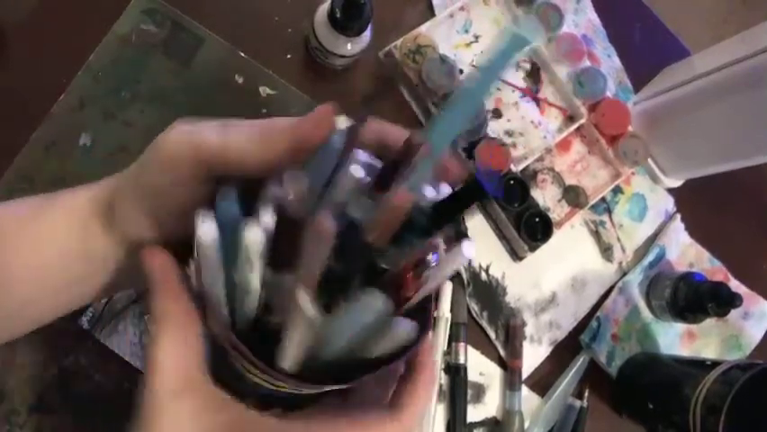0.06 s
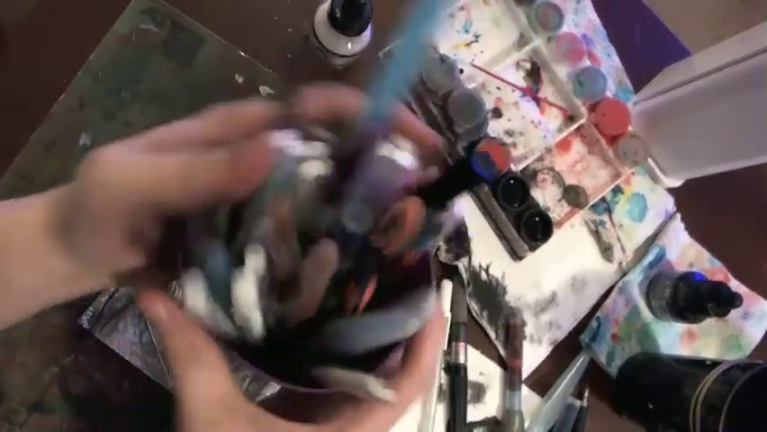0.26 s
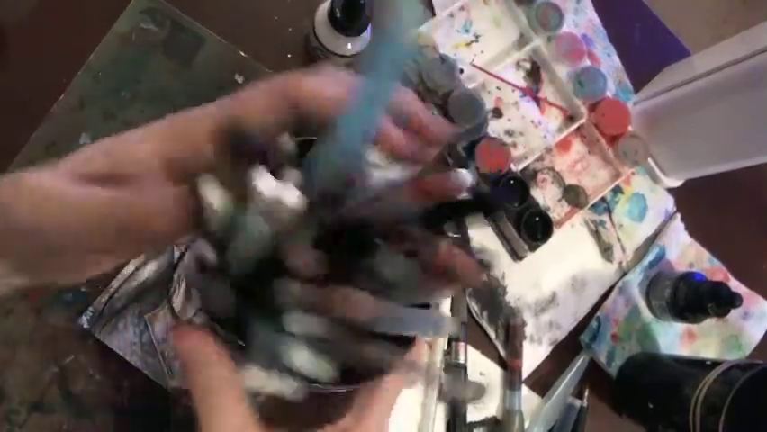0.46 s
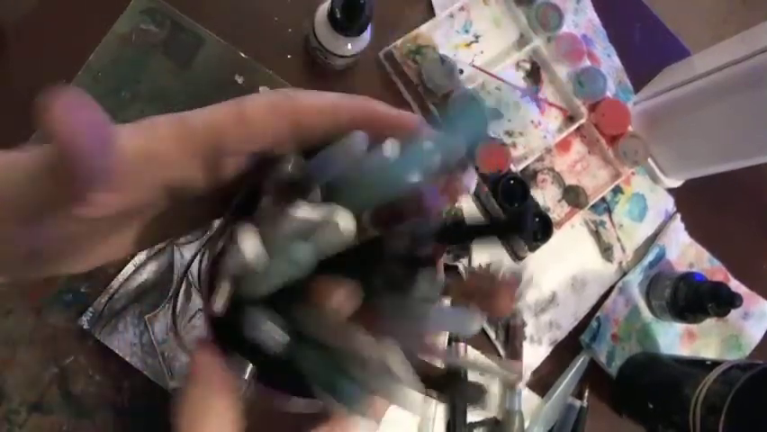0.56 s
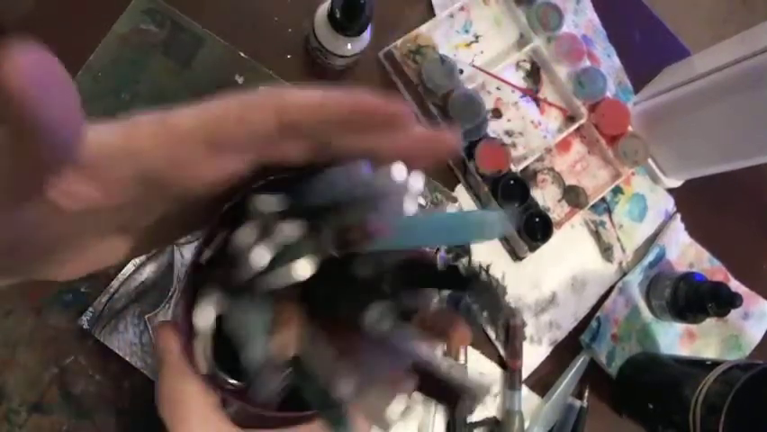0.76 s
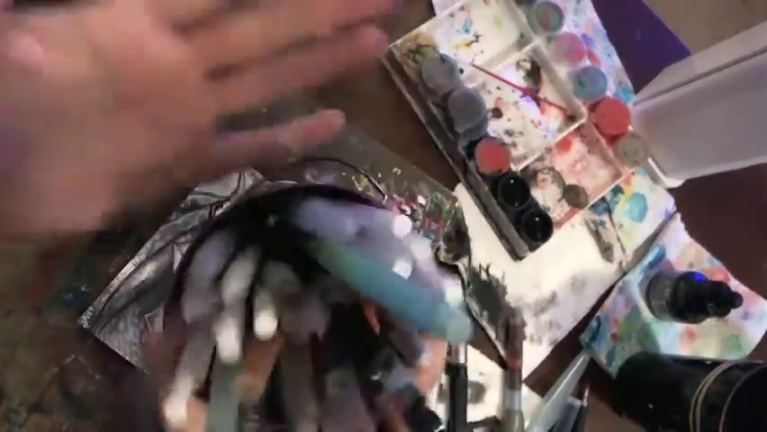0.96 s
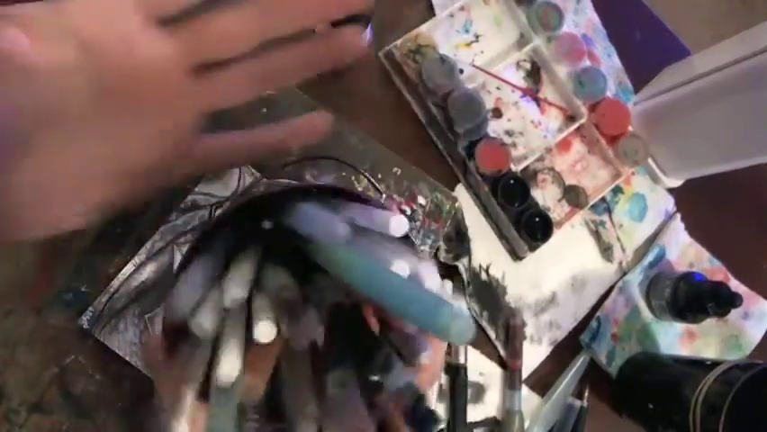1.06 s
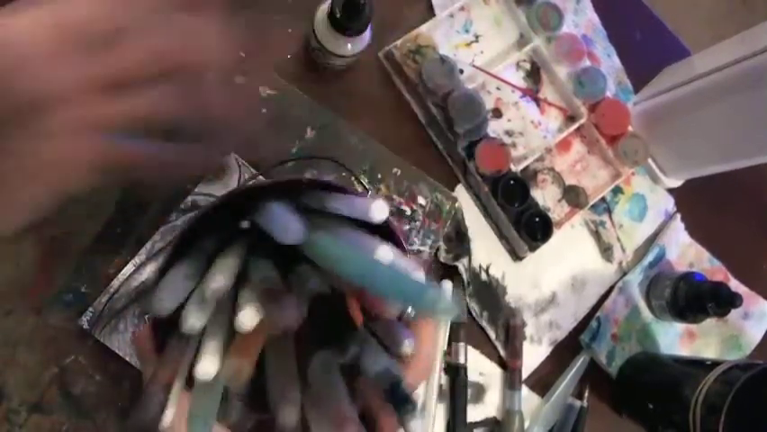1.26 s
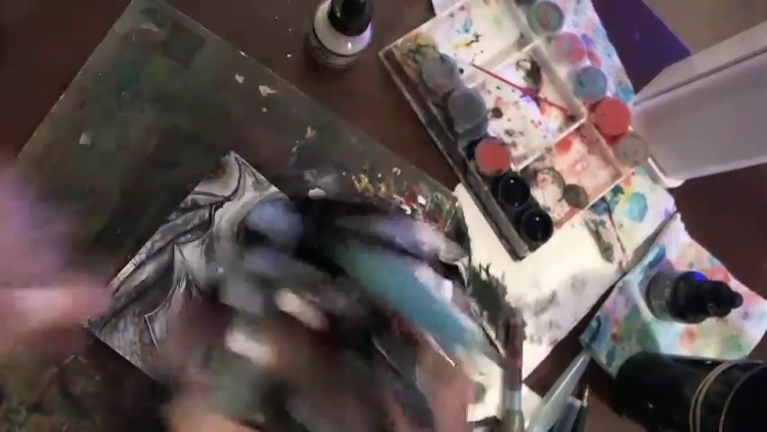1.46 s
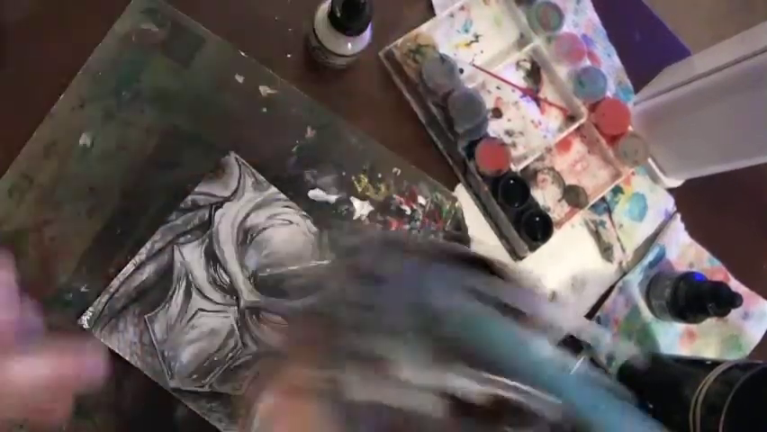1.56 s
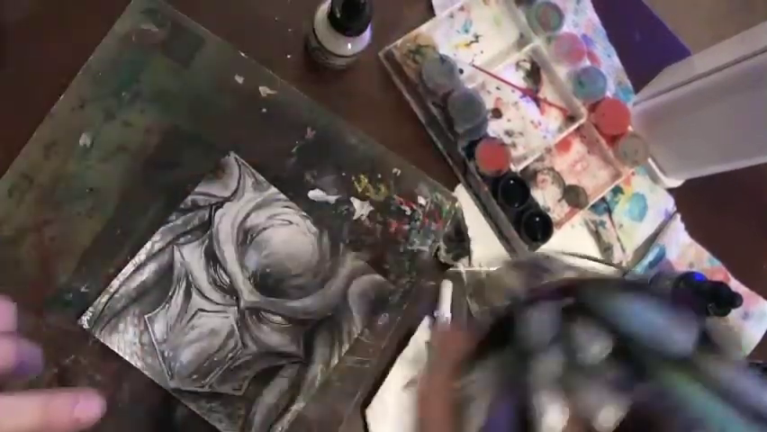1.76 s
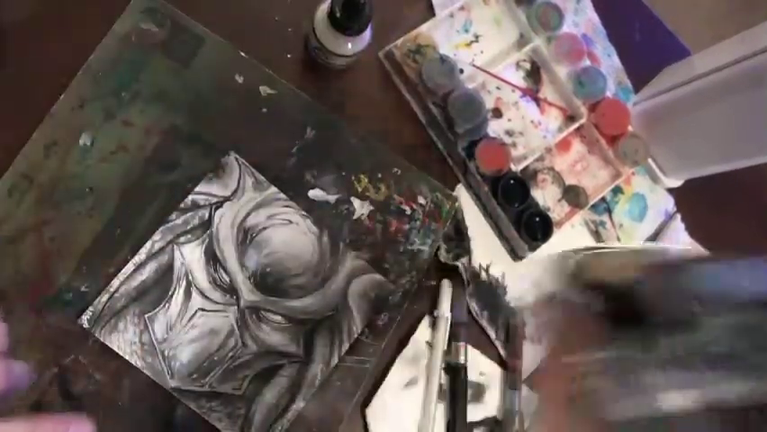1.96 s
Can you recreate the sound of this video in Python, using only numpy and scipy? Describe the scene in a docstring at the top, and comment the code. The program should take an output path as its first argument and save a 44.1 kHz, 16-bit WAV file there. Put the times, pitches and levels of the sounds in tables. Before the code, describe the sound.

Pens clatter and slide inside a crammed cup as it is tipped about, close up in a quiet small room. Two bursts of plastic rattling with hollow knocks are separated by sparse clicks, and a few light clicks finish.

```python
"""A cup crammed with plastic pens and markers, tipped about over a desk in a small room, microphone close.
The pens slide, clack against each other and knock on the wall of the cup, which answers with a hollow
note near 750 Hz. Two flurries of rattling, then a few last clicks, over faint room tone and a short tail
from desk and walls. The hardest knocks overload the recorder."""
import sys
import numpy as np
from scipy import signal
from scipy.fft import rfft, irfft
from scipy.io import wavfile

SR = 44100
rng = np.random.default_rng(int(sys.argv[2]) if len(sys.argv) > 2 else 0)


def store_pcm(level_fs):
    """Save levels as 16-bit WAV."""
    pcm = np.round(np.clip(level_fs, -1, 1) * 32767).astype(np.int16)
    wavfile.write(sys.argv[1], SR, np.atleast_2d(pcm).T)


N = 88200

# spectrum of the steady room tone: f/Hz, level/dB
ROOM_TONE_SPECTRUM = [(20, -8), (55, -22), (105, 6), (200, 1.5), (300, -5), (600, -8.5), (3000, -18),
                      (8000, -25.5), (13000, -37.5)]
# tail from desk and walls, band by band: f/Hz, t60/s, level/dB
ROOM_BANDS = [(320, 0.23, -22), (875, 0.055, -24.5), (1410, 0.094, -28), (2875, 0.16, -23.5),
              (5200, 0.096, -21.5), (9900, 0.15, -26)]
# vigour of the jostling between the clear contacts: t/s, level/dB
JOSTLE_VIGOUR = [(0, -52), (.03, -58), (.06, -38), (.11, -42.5), (.15, -45), (.175, -70), (.2, -59.5),
                 (.27, -32.5), (.31, -38.5), (.4, -30.5), (.47, -28.5), (.62, -39.5), (.68, -50),
                 (.77, -67), (1.12, -79.5), (1.25, -58.5), (1.33, -77.5), (1.41, -52), (1.46, -57.5),
                 (1.52, -34.5), (1.6, -49), (1.66, -37.5), (1.7, -46), (1.77, -67), (1.99, -70)]
# balance of one jostle: level/dB for cup, low clack, high clack, click, tick
JOSTLE_BALANCE = [-10, -7.5, -6, -5, -23]
# pen ends on the bottom of the cup and a bump of the hand: t/s, f/Hz, level/dB
DULL_KNOCKS = [(.415, 546, -38), (.452, 580, -30), (.555, 587, -36), (.611, 441, -35), (1.476, 1510, -25.5),
               (1.542, 330, -38), (1.6589, 1160, -28), (1.849, 1083, -35.5)]
# modes of the cup: ratio to its pitch, level/dB, t60/s
CUP_RESONANCES = [(.88, -13, .022), (1, 0, .024), (1.07, -8, .02)]
# modes shared by the pen barrels: f/Hz, level/dB, t60/s
BARREL_MODES = [(1674, 1, 0.062), (1883, 6.5, 0.06), (2545, 4, 0.038), (2663, 0, 0.042), (3600, 6.5, 0.023),
                (4247, 0.5, 0.05), (4897, 8.5, 0.03), (5230, 11, 0.057), (5697, 5, 0.035),
                (7930, 9.5, 0.03), (8840, -1, 0.04)]
# a pen's low clack, high clack, click and tick: lower f/Hz, upper f/Hz, t60/s, barrel mode level/dB
PEN_BANDS = [(1417, 2150, 0.024, 0), (2195, 3300, 0.008, 2.5), (3540, 7010, 0.023, 0),
             (6150, 10170, 0.034, -5)]
# clear pen contacts: t/s, cup f/Hz, pen f/Hz, then level/dB for cup, low clack, high clack, click, tick
PEN_CONTACTS = [(0.0367, 716, 2510, -53, -43.5, -40, -46, -55),
                (0.0655, 748, 2720, -33.5, -69, -41, -58, -51),
                (0.0807, 781, 2500, -33, -46.5, -37.5, -55, -51),
                (0.0912, 760, 5070, -45, -54.5, -37.5, -34.5, -39),
                (0.145, 774, 5250, -37.5, -55, -55, -46, -57),
                (0.185, 800, 5220, -40, -42, -37, -34, -40.5),
                (0.1972, 790, 2780, -32.5, -37, -29.5, -32, -43),
                (0.2085, 810, 5360, -29, -32.5, -31, -23, -57),
                (0.2253, 753, 3006, -14, -16.5, -14, -19, -25),
                (0.2427, 720, 5300, -45, -23, -22.5, -36, -61.5),
                (0.2494, 733, 5330, -16, -33, -23.5, -12, -23),
                (0.2522, 749, 5800, -18, -27, -20, -27, -31),
                (0.3145, 800, 1650, -36, -32, -34.5, -52, -65),
                (0.3297, 830, 4150, -24, -30.5, -26.5, -18.5, -27),
                (0.3712, 770, 4320, -27.5, -22.5, -32, -8, -19),
                (0.374, 797, 5700, -19, -32.5, -19.5, -13.5, -12.5),
                (0.3849, 774, 5825, -25, -30.5, -26.5, -12.5, -17.5),
                (0.4004, 770, 1830, -29, -25, -52.5, -35, -38.5),
                (0.414, 760, 3590, -25.5, -26, -25, -20, -35.5),
                (0.4237, 778, 2600, -29.5, -32, -27.5, -44, -39),
                (0.4375, 770, 1880, -36, -28, -34.5, -35, -36),
                (0.444, 870, 1940, -26.5, -26, -46.5, -30, -28),
                (0.4498, 740, 2680, -32.5, -22, -24, -22, -40),
                (0.4535, 715, 5560, -18, -24.5, -18.5, -18, -24),
                (0.4831, 840, 1720, -30, -25, -30, -33.5, -50),
                (0.4946, 910, 2660, -34, -28, -25, -26.5, -35),
                (0.5126, 786, 5780, -33, -47, -35.5, -19, -31),
                (0.5221, 845, 5370, -31.5, -29.5, -30.5, -18, -28),
                (0.5366, 765, 2550, -35.5, -45, -30, -37, -49),
                (0.553, 798, 4040, -26.5, -35, -33, -28.5, -52.5),
                (0.5711, 752, 1900, -26, -29, -27.5, -29.5, -48),
                (0.5857, 665, 1850, -32.5, -26, -28, -30, -35.5),
                (0.5931, 750, 1950, -33, -19, -21.5, -21.5, -52),
                (0.6092, 685, 3710, -24.5, -28, -25, -20, -25),
                (0.6135, 741, 2694, -25, -38, -24.5, -26.5, -38),
                (0.633, 820, 2580, -38, -29.5, -29, -25.5, -38),
                (0.648, 716, 5770, -41.5, -36, -32.5, -29, -43),
                (0.691, 823, 4850, -28.5, -33, -34, -33.5, -39),
                (0.696, 785, 4470, -37.5, -43, -32.5, -29, -35),
                (0.821, 727.6, 2610, -45.5, -70, -53.5, -63, -78.5),
                (0.8473, 784, 2437, -66.5, -48.5, -38, -45.5, -58),
                (0.8599, 692, 7500, -56, -41.5, -42.5, -38, -44),
                (0.8938, 890, 2395, -31.5, -27.5, -27, -26.5, -33.5),
                (0.9087, 750, 5065, -26.5, -31.5, -26.5, -18.5, -32),
                (0.9442, 770, 2620, -60.5, -58, -44, -48.5, -65.5),
                (1.1474, 757, 1560, -37, -67, -73, -71.5, -79),
                (1.1809, 784, 2614, -32, -35, -27, -36, -34), (1.199, 765, 2573, -40, -46, -39, -45.5, -55),
                (1.239, 786, 2670, -68, -53, -40, -48, -70),
                (1.2539, 820, 2280, -55.5, -44.5, -33, -43.5, -54.5),
                (1.2933, 790, 5770, -49, -56, -50, -45, -47.5),
                (1.3133, 768, 2330, -56, -61, -49, -55, -64.5),
                (1.352, 844, 2610, -53, -35.5, -29.5, -35.5, -58),
                (1.3602, 786, 7330, -36, -46, -50.5, -38, -38.5),
                (1.3767, 773, 5120, -64, -49, -45, -36.5, -37),
                (1.3932, 950, 2755, -65, -51, -38, -41, -47), (1.422, 760, 8460, -48, -49, -52, -49, -44.5),
                (1.445, 810, 2170, -50, -55, -44, -50, -64.5), (1.4503, 820, 2410, -53, -38, -33, -39, -63),
                (1.477, 770, 1540, -24, -19, -32, -31.5, -53),
                (1.485, 779, 4960, -27.5, -52, -43, -28.5, -45.5),
                (1.494, 763, 2670, -29.5, -40, -20.5, -22.5, -33.5),
                (1.5234, 736, 2600, -20.5, -23, -31.5, -27, -40),
                (1.5312, 760, 2670, -38, -41, -31, -35, -37.5),
                (1.5384, 756, 4630, -18, -30, -17.5, -15, -21.5),
                (1.5479, 743, 5610, -26, -29.5, -20.5, -17, -28),
                (1.6135, 730, 5300, -28.5, -30.5, -33, -28.5, -29),
                (1.6205, 750, 1673, -23, -23.5, -24, -21, -41),
                (1.6354, 745, 2700, -32.5, -51, -32.5, -32, -39.5),
                (1.6592, 797, 9350, -20, -16, -17.5, -14.5, -16.5),
                (1.6728, 760, 5380, -52, -60, -34.5, -27, -28), (1.68, 840, 5130, -52, -54, -40, -48, -22),
                (1.6842, 790, 5210, -52, -43, -43, -25.5, -31),
                (1.7068, 760, 2770, -74, -41, -42, -38, -44),
                (1.849, 770, 2540, -40, -44.5, -31.5, -30.5, -35),
                (1.8963, 844, 2570, -58.5, -47, -28, -33.5, -29.5),
                (1.9015, 870, 5026, -54, -42.5, -34, -22.5, -38)]
# colour of the two microphone ports: f/Hz, left minus right level/dB
PORT_COLOUR = [(200, -.5), (550, 3), (2700, -1.04), (3950, -6), (5000, 1.5), (6100, 3), (7000, .5)]

ROOM_TONE_DB, ROOM_TONE_WIDTH = -64.5, .3
FIRST_ECHO_S, TAIL_SIDE_SHARE = 0.0044, 0.06
CUP_HZ, CUP_RISE_S = 766, 0.0016
CUP_AIR_HZ, CUP_AIR_T60_S, CUP_AIR_DB = 762, 0.091, -8.5
THUD_DB, THUD_TOP_HZ, THUD_T60_S = -35, 380, 0.051   # level relative to the cup's note
JOSTLES_PER_S, JOSTLE_SPREAD_DB = 150, 3
SCRAPE_DB, SCRAPE_CUP_DB = -12, -3   # relative to the jostling; the cup relative to the barrels
KNOCK_T60_S, KNOCK_EDGE_RATIO = 0.018, 1.35
GRAZE_DB, GRAZE_LEAD_S = -17.5, .0035
MODE_SPREAD_DB, PEN_DETUNE, CUP_DETUNE = 7, 0.018, 0.028   # from one contact to the next
PEN_RISE_S, PEN_NOTE_DB, PEN_NOTE_T60_S = 0.00054, 4, .022
PEN_LOW_HZ = 600   # thin pens radiate little below this
ONSET_S, CONTACT_S = .006, .05
SOFT_RISE_S, FIRM_DB = 0.0016, -31   # contacts well under this level swell instead of snapping
DAMPING_PER_S = 650   # a pen driven hard into the bundle stops sooner: extra decay rate at full scale
OVERLOAD_CEILING, LOW_CUT_HZ, HIGH_CUT_HZ = 1.06, 50, 13700


def from_db(db):
    return 10 ** (np.asarray(db) / 20)


def band(x, low_hz, high_hz, order=2):
    edges_hz = [low_hz, min(high_hz, .45 * SR)]
    return signal.sosfilt(signal.butter(order, edges_hz, "band", fs=SR, output="sos"), x)


def decay(t, t60):
    return np.exp(-np.log(1000) * t / t60)


def unit_onset(x):
    """Scale each row to rms 1 over its first milliseconds."""
    return x / np.sqrt(np.mean(x[:, :int(ONSET_S * SR)] ** 2, axis=1, keepdims=True) + 1e-20)


def add(out, start_s, sound):
    i = int(np.clip(start_s * SR, 0, N))
    out[i:i + len(sound)] += sound[:N - i]


def room_tone():
    """The room itself: a faint low rumble with a trace of hiss."""
    hz, db = np.transpose(ROOM_TONE_SPECTRUM)
    bins_hz = np.arange(N // 2 + 1) * SR / N
    gain = from_db(np.interp(np.log(bins_hz + 1), np.log(hz), db))
    mid, side = irfft(rfft(rng.standard_normal((2, N))) * gain, N)
    return from_db(ROOM_TONE_DB) * (mid + ROOM_TONE_WIDTH * side * [[1], [-1]]) / mid.std()


def room_tail(x):
    """Desk and nearby walls return a short tail, dying at its own pace in each band."""
    t = np.arange(SR // 2) / SR
    centres_hz = np.array([row[0] for row in ROOM_BANDS])
    edges_hz = [40, *np.sqrt(centres_hz[1:] * centres_hz[:-1]), 12000]
    response = 0
    for (_, t60, db), low, high in zip(ROOM_BANDS, edges_hz, edges_hz[1:]):
        tails = band(rng.standard_normal((2, len(t))) * decay(t, t60) * (t > FIRST_ECHO_S), low, high)
        mid, side = tails / np.sqrt(np.sum(tails ** 2, axis=1, keepdims=True))
        stereo = np.sqrt(1 - TAIL_SIDE_SHARE) * mid + np.sqrt(TAIL_SIDE_SHARE) * side * [[1], [-1]]
        response = response + from_db(db) * stereo
    return signal.fftconvolve(x[None], response, axes=1)[:, :N]


def cup_air(x):
    """The air in the cup rings on at one pitch after every contact."""
    width_hz = np.log(1000) / (np.pi * CUP_AIR_T60_S)
    resonance = signal.iirpeak(CUP_AIR_HZ, CUP_AIR_HZ / width_hz, fs=SR)
    return from_db(CUP_AIR_DB) * signal.lfilter(*resonance, x)


def scrape():
    """Barrels sliding on each other hiss with the jostling, and stir the cup."""
    barrels = band(rng.standard_normal(N), 1700, 9500)
    cup = band(rng.standard_normal(N), 830, 960)
    friction = barrels / barrels.std() + from_db(SCRAPE_CUP_DB) * cup / cup.std()
    vigour_db = np.interp(np.arange(N) / SR, *np.transpose(JOSTLE_VIGOUR))
    return from_db(vigour_db + SCRAPE_DB) * friction


def jostles():
    """Contact rows for the small chance touches of pens shifting in the bundle."""
    count = int(JOSTLES_PER_S * N / SR)
    starts_s = (np.arange(count) + rng.random(count)) * N / SR / count
    chance = rng.standard_normal((count, 8))
    vigour_db = np.interp(starts_s, *np.transpose(JOSTLE_VIGOUR)) + JOSTLE_SPREAD_DB * chance[:, 0]
    cup_hz = CUP_HZ * np.exp(.05 * chance[:, 1])
    pen_hz = 3600 * np.exp(.5 * chance[:, 2])
    levels_db = vigour_db[:, None] + np.array(JOSTLE_BALANCE) + 2 * chance[:, 3:]
    return np.column_stack([starts_s, cup_hz, pen_hz, levels_db])


def grazes():
    """Contact rows for each pen brushing its neighbours just before it lands."""
    rows = np.array(PEN_CONTACTS, float)
    rows[:, 0] -= GRAZE_LEAD_S * (.5 + rng.random(len(rows)))
    rows[:, 3:] += GRAZE_DB
    return rows


def dull_knocks():
    """Pen ends and the hand bump the cup: heavily damped, each around a pitch of its own."""
    t, out = np.arange(SR // 10) / SR, np.zeros(N)
    for start_s, hz, db in DULL_KNOCKS:
        burst = rng.standard_normal(len(t)) * decay(t, KNOCK_T60_S)
        knock = band(burst, hz / KNOCK_EDGE_RATIO, hz * KNOCK_EDGE_RATIO)
        add(out, start_s, from_db(db) * knock / np.sqrt(np.sum(knock ** 2) / (ONSET_S * SR)))
    return out


def ringing(modes, t, count, detune, scale=1):
    """One row per contact: every mode rings with a strength and a slight detuning of its own."""
    out = 0
    for pitch, db, t60 in modes:
        strength, shift = rng.standard_normal((count, 2)).T[:, :, None]
        hz = pitch * scale * (1 + detune * shift)
        out = out + from_db(db + MODE_SPREAD_DB * strength) * decay(t, t60) * np.sin(2 * np.pi * hz * t)
    return unit_onset(out)


def cup_knocks(t, cup_hz):
    """The struck wall gives a hollow note, with a faint thud of the whole cup beneath it."""
    wall = ringing(CUP_RESONANCES, t, len(cup_hz), CUP_DETUNE, scale=cup_hz)
    note = band(wall * (1 - np.exp(-t / CUP_RISE_S)), 550, 1200)
    thud = band(rng.standard_normal((len(cup_hz), len(t))) * decay(t, THUD_T60_S), 25, THUD_TOP_HZ)
    return unit_onset(note) + from_db(THUD_DB) * unit_onset(thud)


def pen_clicks(t, pen_hz, low_hz, high_hz, t60, barrel_db):
    """A short crack of crowded modes in one band, with the pen's own note and shared barrel modes."""
    burst = rng.standard_normal((len(pen_hz), len(t))) * decay(t, t60)
    crack = unit_onset(band(burst, low_hz, high_hz, order=3))
    modes = [mode for mode in BARREL_MODES if low_hz <= mode[0] < high_hz]
    barrels = ringing(modes, t, len(pen_hz), PEN_DETUNE)
    in_band = (low_hz <= pen_hz) * (pen_hz < high_hz)
    note = unit_onset(np.sin(2 * np.pi * pen_hz * t) * decay(t, PEN_NOTE_T60_S)) * in_band
    click = crack + from_db(barrel_db) * barrels + from_db(PEN_NOTE_DB) * note
    return unit_onset(click * (1 - np.exp(-t / PEN_RISE_S)))


def pens_in_cup(contacts):
    """Every contact sounds both cup and pens; hard contacts start sharpest and die soonest."""
    t = np.arange(int(CONTACT_S * SR)) / SR
    starts_s, cup_hz, pen_hz, *levels_db = np.transpose(contacts)[:, :, None]
    force = from_db(np.max(levels_db, axis=0))
    rise_s = SOFT_RISE_S / (1 + (force / from_db(FIRM_DB)) ** 2)
    envelope = (1 - np.exp(-t / rise_s)) * np.exp(-DAMPING_PER_S * force * t)
    parts = [cup_knocks(t, cup_hz)] + [pen_clicks(t, pen_hz, *row) for row in PEN_BANDS]
    cup, *pens = [from_db(db) * unit_onset(part * envelope) for db, part in zip(levels_db, parts)]
    sounds = cup + band(sum(pens), PEN_LOW_HZ, SR)
    out = np.zeros(N)
    for start_s, sound in zip(starts_s[:, 0], sounds):
        add(out, start_s, sound)
    return out


def scene():
    """The rattling cup close up, the small room behind it."""
    contacts = np.vstack([PEN_CONTACTS, grazes(), jostles()])
    rattle = pens_in_cup(contacts) + dull_knocks() + scrape()
    return rattle + cup_air(rattle) + room_tail(rattle) + room_tone()


def record(dry):
    """Each microphone port adds its colour; the recorder flattens hard peaks and cuts bass and top."""
    hz, db = np.transpose(PORT_COLOUR)
    lean_db = np.interp(np.arange(N // 2 + 1) * SR / N, hz, db) * np.array([[.5], [-.5]])
    coloured = irfft(rfft(dry) * from_db(lean_db), N)
    envelope = np.abs(signal.hilbert(coloured, axis=1))
    flattened = coloured / (1 + (envelope / OVERLOAD_CEILING) ** 10) ** (1 / 10)
    thinned = signal.sosfilt(signal.butter(1, LOW_CUT_HZ, "high", fs=SR, output="sos"), flattened)
    high_cut = signal.firwin(91, HIGH_CUT_HZ, window="blackman", fs=SR)
    return signal.fftconvolve(thinned, high_cut[None], "same", axes=1)


dry = scene()
out = record(dry)
store_pcm(out)
```